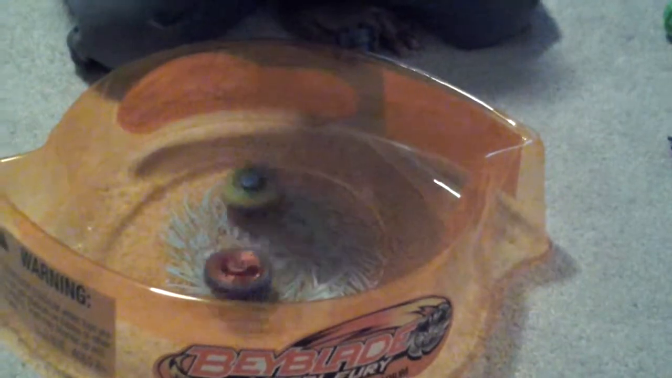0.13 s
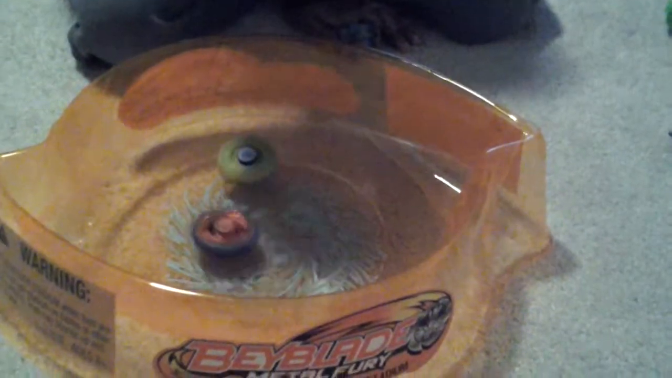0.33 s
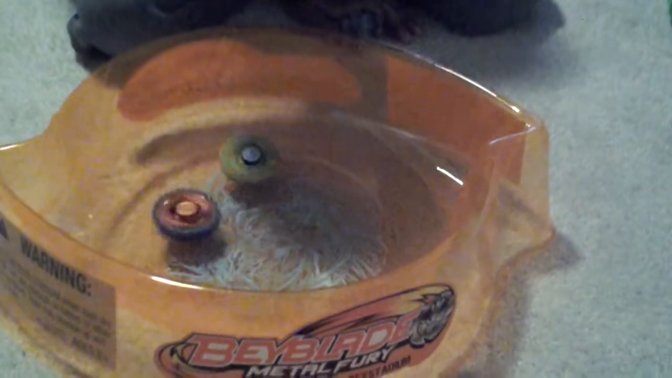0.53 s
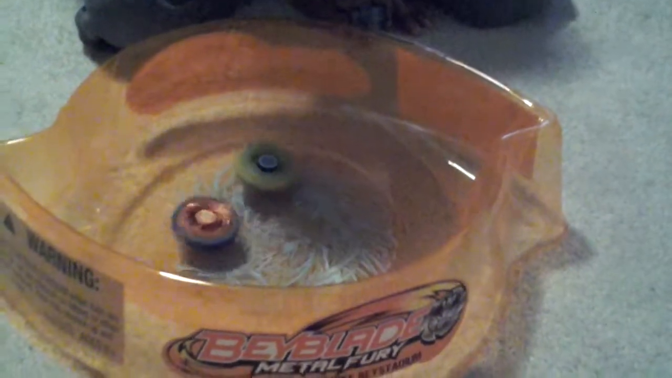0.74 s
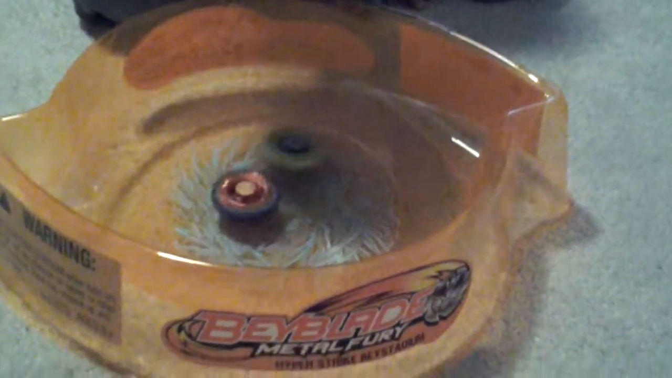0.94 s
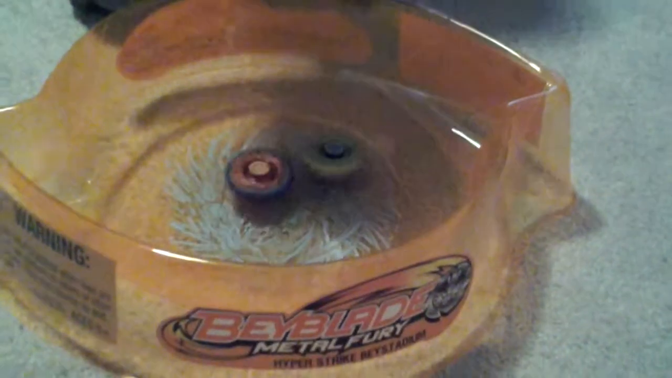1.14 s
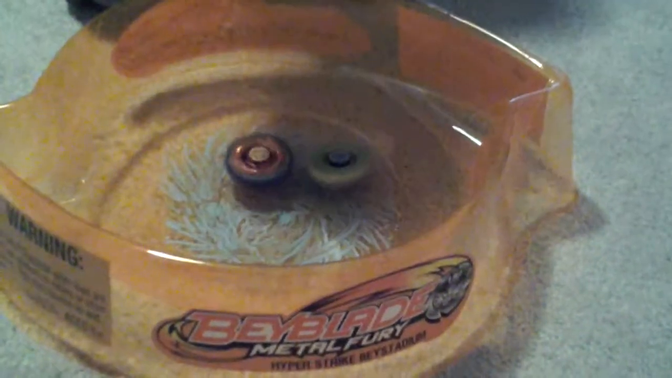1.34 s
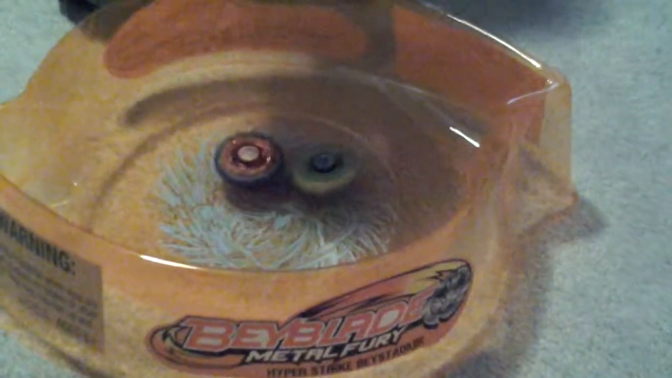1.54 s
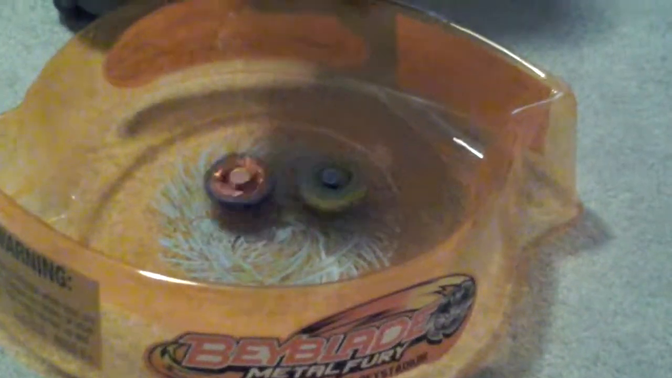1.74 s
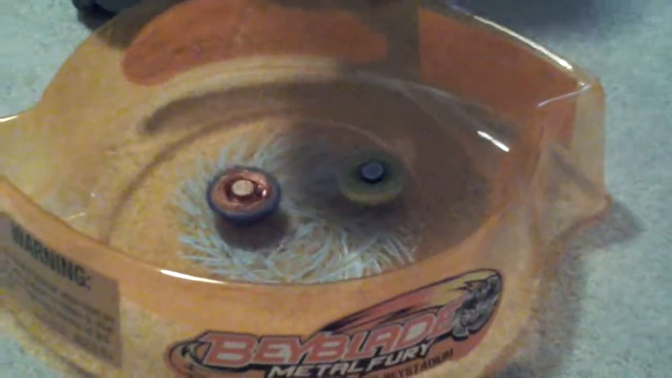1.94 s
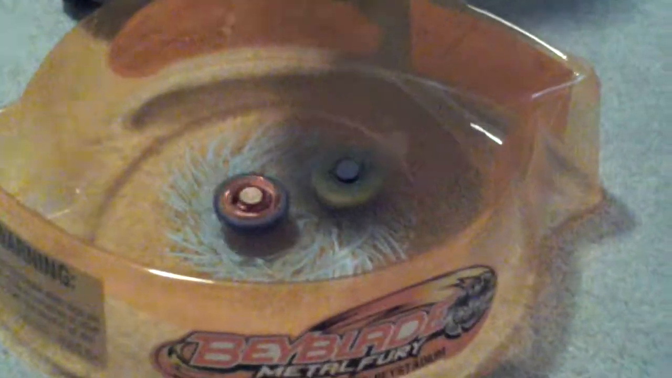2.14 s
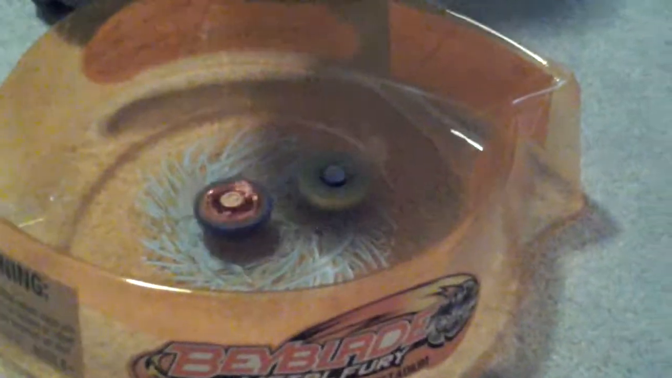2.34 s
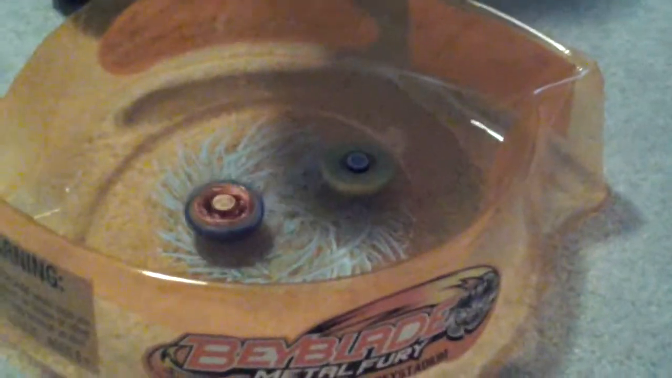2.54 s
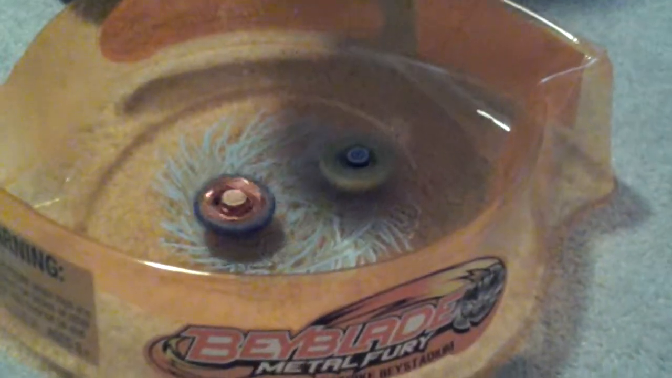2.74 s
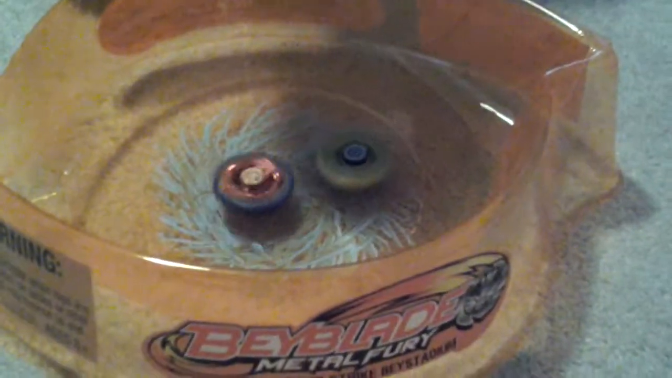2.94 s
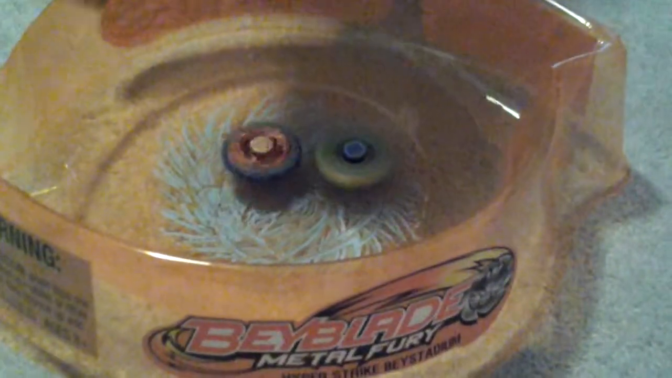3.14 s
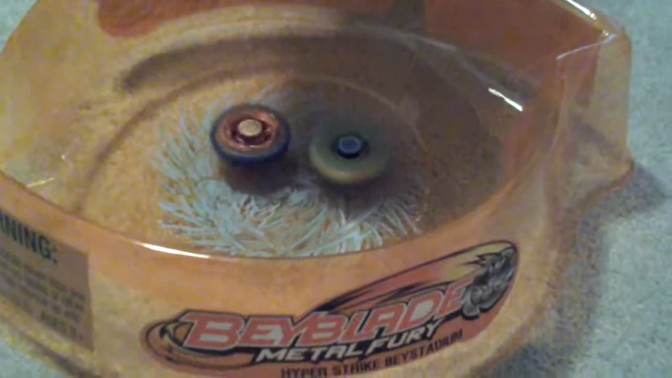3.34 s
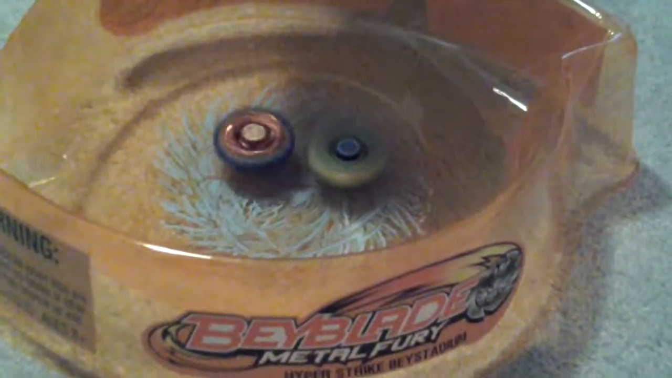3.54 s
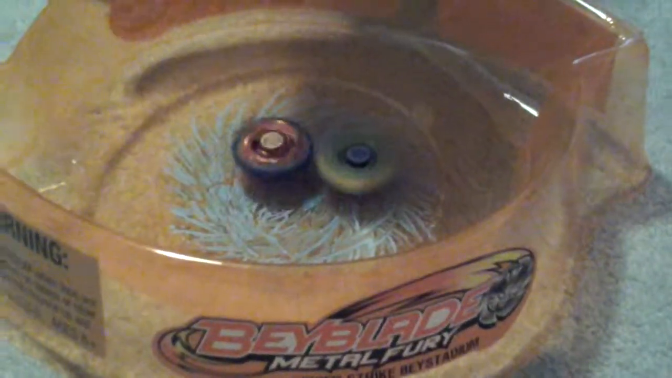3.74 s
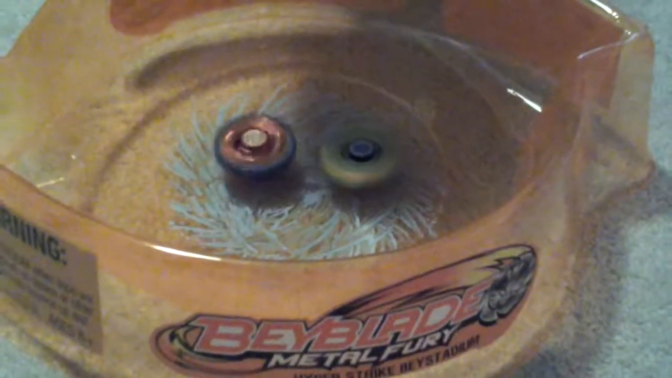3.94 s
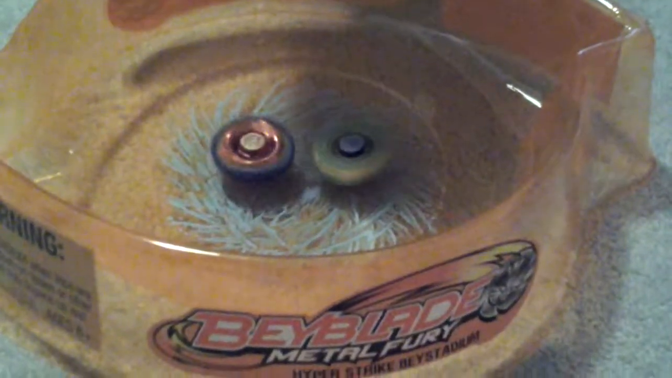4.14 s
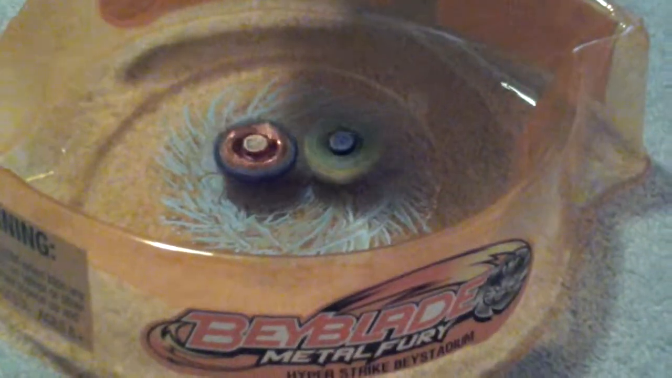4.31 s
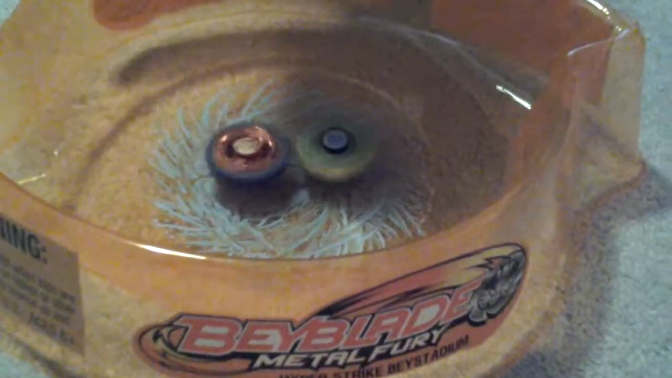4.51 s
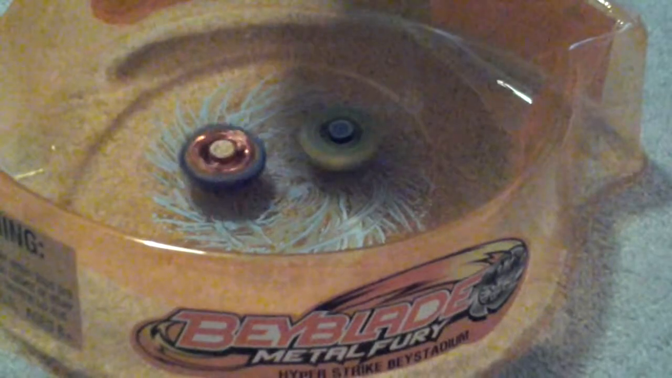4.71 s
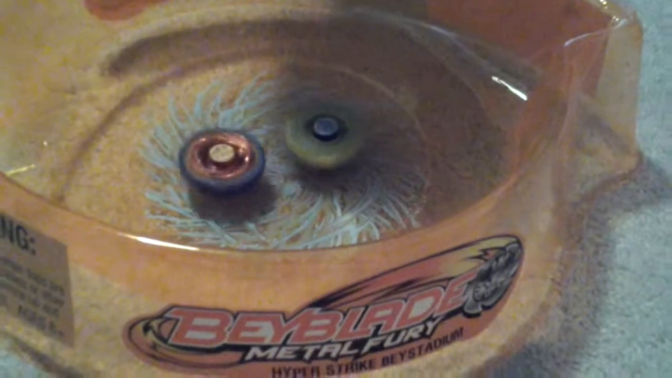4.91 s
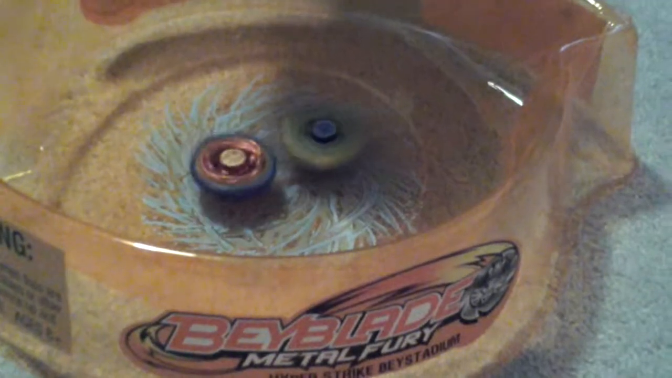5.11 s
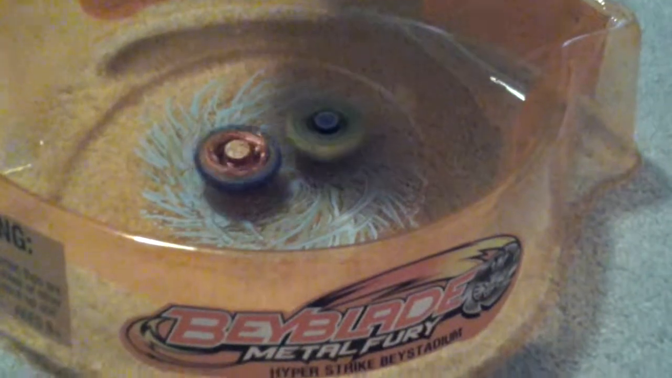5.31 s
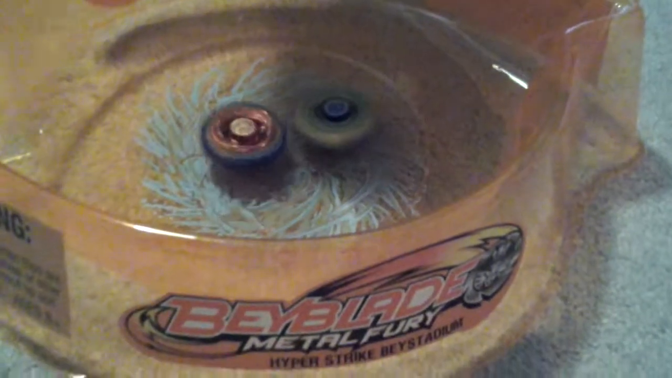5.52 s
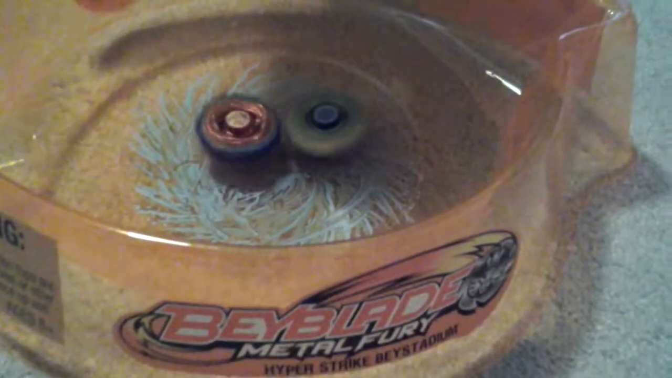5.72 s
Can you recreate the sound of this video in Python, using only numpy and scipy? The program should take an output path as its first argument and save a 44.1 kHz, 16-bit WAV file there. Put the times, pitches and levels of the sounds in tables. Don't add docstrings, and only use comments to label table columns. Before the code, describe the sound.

Two metal spinning tops grind and rattle rapidly in a thin plastic bowl, clashing with sharp, ringing cracks over a steady appliance hum.

```python
import sys
import numpy as np
from scipy import signal
from scipy.fft import rfft, irfft, next_fast_len
from scipy.io import wavfile
from scipy.ndimage import uniform_filter1d

SR = 44100
rng = np.random.default_rng(int(sys.argv[2]) if len(sys.argv) > 2 else 0)


def waveform_to_disk(signal):
    frames = np.transpose(np.atleast_2d(signal))
    scaled = np.clip(frames, -1, 1) * 32767
    samples = np.round(scaled).astype(np.int16)
    wavfile.write(sys.argv[1], SR, samples)


def ratio(d):
    e = np.asarray(d, float) / 20
    return 10 ** e


N = 258867

# (frequency [Hz], density [dB per Hz])
AIR_SPECTRUM = [(24, -71), (40, -34.5), (123, -35), (218, -6.5), (287, -19), (333, -9.5), (577, -8.5),
                (722, -5.5), (973, -9.5), (1190, -2.5), (3300, -18), (8310, -32), (9650, -28),
                (14000, -22.5), (15500, -90)]
AIR_DB = -38.5
# (frequency [Hz], bandwidth [Hz], level [dB])
HUM_RESONANCES = [(109, 2.7, -69), (194, 5, -84), (230, 10, -63), (305.5, 21, -57.5), (347.5, 29, -54.5),
                  (654.4, 4.4, -53.5), (737.4, 12, -47.5), (718, 95, -62.5), (841, 6.2, -51.5),
                  (1169, 7.7, -52)]
# (frequency [Hz], level [dB])
HUM_TONES = [(359, -52.5), (737, -51.5), (122, -74)]
# (frequency [Hz], t60 [s])
ROOM_DECAY = [(250, 0.34), (1000, 0.82), (3000, 0.31), (6000, 0.25), (10000, 0.25), (15000, 0.26)]
# (delay [s], level [dB])
NEAR_ECHOES = [(.0045, -26), (0.0115, -25.5), (0.0185, -63), (.026, -24.5)]
# (time [s], level [dB])
GRIND_LEVEL = [
    (0, -43.5),
    (0.401, -44),
    (1, -49),
    (2, -53.5),
    (3.001, -55),
    (4, -58),
    (5.002, -65),
    (5.87, -55.5),
]
# (frequency [Hz], gain [dB])
TIP_COLOUR = [(120, -16.5), (250, 6), (500, 5), (1200, 0), (2500, -5.5), (4500, -7), (7000, -10),
              (11000, -17.5)]

# (frequency [Hz], gain [dB])
SHELL_COLOUR = [(2500, -23.5), (3300, -9), (4000, -7), (5000, 3), (5600, 0.5), (6200, 4), (6900, -7.5),
                (7800, -7.5), (9200, -15.5), (10500, -17.5), (14000, -19.5)]
SPIN_START, DRAG_PER_S, FIRST_TURN = 28.64, 1.237, -0.022
# (time [s], loss [turns per second])
SPIN_LOSSES = [
    (.906, .954),
    (1.758, .27),
    (2.34, -.051),
    (3.779, .114),
    (4.553, .321),
]
# (start [s], first knock [dB], second knock [dB],
# place of the second knock in the turn [0-1], brightness [dB per octave])
WOBBLE_SWINGS = [(-.05, -35.5, -33.5, 0.59, 0), (.25, -35, -37, 0.58, -1), (0.458, -39.5, -35, 0.54, -2),
                 (0.691, -38.5, -36, 0.44, -1.5), (0.901, -36, -36.5, 0.66, -1.5),
                 (1.251, -40.5, -32.5, 0.62, -0.5), (1.51, -38, -31.5, .54, -.5),
                 (1.758, -39, -33.5, 0.7, -5.5), (2.149, -35, -37, 0.65, -1.5), (2.36, -36, -34, .56, 0),
                 (2.75, -33.5, -34, 0.58, 1), (3.049, -39.5, -43, .55, -2.5), (3.189, -41, -34.5, 0.65, 0),
                 (3.619, -39, -38, .58, -2), (3.922, -38.5, -42.5, .62, -0.5), (4.44, -39, -38, 0.63, -5),
                 (4.97, -55, -53, .56, -9), (5.45, -53, -49, 0.4, -7), (5.8, -69, -80, .6, -15.5)]
LULL_DB, WAKE_S, TIRE_S, SAG_DB_PER_S = (6, 9), 0.05, 0.04, (5, 9)
FIRST_PLACE, SLIDE_PER_S = 0.038, (0.17, 0.34)
KNOCK_S = (0.0037, 0.0053)

# (time [s], peak [dB], brightness [dB per octave], contact time [ms], share sent to the room [dB])
RIM_CLASHES = [(0.906, -3.5, 3.5, 2.58, 5), (1.758, 3.5, 2.7, 2.33, 2), (2.34, 5.5, 2.8, 3.13, 3),
               (3.737, -8.5, 1.5, 3.2, 1.5), (3.779, -2.5, 3.2, 2.3, 4.5), (4.327, -8.5, 2.5, 4.2, 1.5),
               (4.498, -8, 0.5, 3.4, 1), (4.553, -2, 2.9, 2.55, 1), (5.111, -6.5, 1.3, 2.33, 2),
               (5.462, -4.5, 1, 2.2, 7), (5.842, -7, 2, 2.26, 2)]
# (frequency [Hz], frequency [Hz], frequency [Hz])
STRUCK_PARTS = [(7300, 5200, 6000), (6330, 6990, 5000), (4800, 5850, 7430), (3970, 5020, 5880),
                (3970, 7600, 5600), (5910, 7050, 4500), (4710, 3910, 4300), (5450, 9010, 3400),
                (5310, 6160, 4520), (4530, 7590, 5290), (3890, 5190, 4530)]
# (level [dB], level [dB], level [dB])
STRUCK_PART_DB = (10, 8, 7)
OFF_AXIS = 0.33
# (time [s], peak [dB])
GLANCING_TOUCHES = [
    (0.9025, -11),
    (0.9315, -53),
    (3.729, -45),
    (3.79, -39),
    (4.492, -24),
    (4.566, -18),
    (4.574, -35),
]
# (oval mode [dB], first wheel's high mode [dB], second wheel's high mode [dB],
# bowl floor [dB], bowl wall [dB])
CLASH_RINGS = [(-44, -45, -52, -12, -22), (-15.5, -38, -25, -15, -22), (-20, -24, -45, -17, -20),
               (-50, -45, -52, -22, -20), (-50, -48, -46, -17, -14), (-30, -52, -44, -24, -11),
               (-48, -40, -55, -18, -14), (-49, -35, -50, -23, -21), (-26, -62, -62, -21, -22),
               (-13.5, -50, -36, -21, -18), (-26, -47, -43, -17, -11)]
# (column of CLASH_RINGS, frequency [Hz], level [dB], t60 [s])
METAL_MODES = [(0, 4520, 0, .24), (0, 4570, -1, .2), (0, 4465, -6, .12), (0, 4640, -7, .12),
               (1, 11440, -2, .13), (1, 11550, 0, .1), (2, 11950, 0, .14), (2, 11850, -3, .14),
               (2, 12020, -5, .12)]
# (frequency [Hz], gain [dB])
CRACK_COLOUR = [(300, -17), (1200, -11), (2200, -9), (3000, -9), (3800, 1), (5000, 0.5), (6300, -3.5),
                (7500, -4), (10000, -12.5), (11600, -10), (13500, -12.5), (15700, -21)]
# (frequency [Hz], level [dB], t60 [s])
BOWL_MODES = [(580, -9.5, 0.04), (1027, -14, 0.07), (1413, -18, 0.13), (1693, -0.5, 0.029),
              (1800, -14.5, 0.024), (2633, -5.5, 0.039), (2590, 12, 0.015)]
WALL_HZ = 2200

MIC_LOW_HZ, MIC_HIGH_HZ = 110, 14700
# (time [s], level [dB])
INPUT_JOLTS = [
    (1.758, -28.5),
    (2.34, -47),
    (3.779, -42),
    (4.327, -57),
    (4.499, -53),
    (4.553, -28.5),
    (5.462, -59),
]
JOLT_S = 0.00041
# (frequency [Hz], level under the loudest part [dB])
DROPOUT_LIMIT = [(60, -30.5), (250, -38), (400, -60), (7000, -71), (9000, -33), (10500, -23.5),
                 (14500, -20.5), (16000, -10)]


def evened(x):
    return x / np.sqrt(np.mean(x ** 2) + 1e-20)


def read(points, hz):
    f, value = np.transpose(points)
    return np.interp(np.log(hz + 1), np.log(f + 1), value)


def add(mix, s, sound):
    part = mix[max(round(s * SR), 0):][:len(sound)]
    part += sound[:len(part)]


def coloured(x, points, tilt_db=0, peaks=()):
    size = next_fast_len(len(x))
    hz = np.fft.rfftfreq(size, 1 / SR)
    gain_db = read(points, hz) + tilt_db * np.log2(hz / 5000 + 0.29)
    gain_db += sum(db * np.exp(-((hz - f) / 260) ** 2) for f, db in peaks)
    return irfft(rfft(x, size) * ratio(gain_db), size)[:len(x)]


def ring(hz, db, t60, t, phase=0):
    return ratio(db - 60 * t / t60) * np.sin(2 * np.pi * (hz * t + phase))


def band(hz, width):
    radius = np.exp(-np.pi * width / SR)
    drive = rng.standard_normal(N) + 1j * rng.standard_normal(N)
    envelope = signal.lfilter([1], [1, -radius], drive)
    return evened((envelope * np.exp(2j * np.pi * hz * np.arange(N) / SR)).real)


def air():
    t = np.arange(N) / SR
    wash = ratio(AIR_DB - 7.5) * evened(coloured(rng.standard_normal(N), AIR_SPECTRUM))
    tones = sum(ratio(db) * np.sin(2 * np.pi * hz * t) for hz, db in HUM_TONES)
    resonances = sum(ratio(db - 5.5) * band(hz, width) for hz, width, db in HUM_RESONANCES)
    return wash + tones + resonances


def room(x):
    out, t = np.zeros(N), np.arange(N) / SR
    for k in range(3):
        taps = np.zeros(SR // 2)
        at = np.arange(200, len(taps) - 20, 20)
        taps[at + rng.integers(0, 20, len(at))] = rng.choice([-1., 1.], len(at))
        hz, time, z = signal.stft(taps, SR, nperseg=256)
        decay = ratio(-60 * time / read(ROOM_DECAY, hz)[:, None])
        tail = signal.istft(z * decay, SR, nperseg=256)[1]
        tail *= 1 - np.exp(-np.arange(len(tail)) / SR / 0.0039)
        share = np.sqrt(2 / 3) * np.cos(np.pi * (3.1 * t + k / 3))
        out += signal.fftconvolve(x * share, tail / np.linalg.norm(tail))[:N]
    near = np.zeros(SR // 20)
    for s, db in NEAR_ECHOES:
        add(near, s, ratio(db) * rng.standard_normal(24) / 5)
    return ratio(-10.5) * out + signal.fftconvolve(x, near)[:N]


def grind():
    uneven_db = 2.8 * evened(uniform_filter1d(rng.standard_normal(N), 300))
    grains = rng.standard_normal(N) * ratio(uneven_db)
    level_db = np.interp(np.arange(N) / SR, *np.transpose(GRIND_LEVEL)) - 1
    return ratio(level_db) * evened(coloured(grains, TIP_COLOUR))


def knock_plan():
    t = np.arange(N) / SR
    turns = FIRST_TURN + SPIN_START * t - DRAG_PER_S * t ** 2 / 2
    turns -= sum(lost * np.maximum(t - s, 0) for s, lost in SPIN_LOSSES)
    start, *levels_db, place, bright_db = np.transpose(WOBBLE_SWINGS)
    plan = []
    for side, late in enumerate([FIRST_PLACE + 0 * place, place]):
        turn = np.arange(int(np.interp(start[-1], t, turns)))
        rough = np.interp(turn + side / 2, turns, t)
        swing = np.clip(np.searchsorted(start, rough) - 1, 0, len(start) - 2)
        since, until = rough - start[swing], start[swing + 1] - rough
        at = np.interp(turn + late[swing] - SLIDE_PER_S[side] * since, turns, t)
        lull = np.exp(-since / WAKE_S) + np.exp(-until / TIRE_S)
        level_db = levels_db[side][swing] - SAG_DB_PER_S[side] * since - LULL_DB[side] * lull
        plan.append([at, level_db, bright_db[swing]])
    return np.transpose(plan, (2, 0, 1)).reshape(-1, 3)


def whirr():
    when, knock_db, _ = knock_plan().reshape(-1, 2, 3).mean(1).T
    t = np.arange(N) / SR
    db = np.interp(t, when, knock_db, right=-90)
    early_db = 4 * np.exp(-t / 0.35)
    slide = coloured(rng.standard_normal(N), SHELL_COLOUR, -1.2, [(4200, 14), (5000, 4.1)])
    return ratio(db + early_db - 13.5) * evened(slide)


def rattle():
    out, t = np.zeros(N), np.arange(512) / SR
    for k, (at, level_db, bright_db) in enumerate(knock_plan()):
        length_s = KNOCK_S[k % 2]
        luck, chatter, bumps = rng.standard_normal(2), rng.standard_normal(512), rng.standard_normal(512)
        peaks = [(5900, 4.3 * bright_db), (4030, 6.7)]
        chatter = evened(coloured(chatter, SHELL_COLOUR, bright_db, peaks))
        uneven = ratio(2.4 * evened(uniform_filter1d(uniform_filter1d(bumps, 40), 30)))
        envelope = np.minimum(t / 0.00016, 1) / (1 + np.exp((t - length_s) / 0.00039))
        knock = chatter * uneven * envelope
        loud = np.sqrt(uniform_filter1d(knock ** 2, 130).max())
        gain = ratio(level_db + 0.9 * luck[0] + 3)
        add(out, at - length_s / 2 + 0.00045 * luck[1], gain * knock / loud)
    return out


def crack(db, tilt_db, contact_ms, thud_db, peaks):
    t = np.arange(4096) / SR
    u = t / (contact_ms / 1000)
    push = u ** 0.6 * (np.exp(-2.4 * u) + 0.08 * np.exp(-1.0 * u))
    noise = rng.standard_normal(len(t))
    for _ in range(2):
        even = rfft(noise * push)
        noise = irfft(even / (abs(even) + 1e-9)) / (push + 0.05 * push.max())
    sharp = coloured(np.roll(noise * push, 240), CRACK_COLOUR, tilt_db, peaks)[200:-200]
    bowl = np.zeros(len(t))
    for hz, level_db, t60 in BOWL_MODES:
        level_db += thud_db[int(hz > WALL_HZ)]
        bowl += ring(hz * rng.normal(1, 0.04), level_db, t60, t, rng.random())
    thud = ratio(-9.5) * bowl * np.minimum(t / 0.0036, 1)
    return ratio(db) * (sharp / abs(sharp).max() + thud[:-400])


def metal_ring(strength_db):
    t = np.arange(SR // 2) / SR
    modes = np.zeros(len(t))
    for column, hz, db, t60 in METAL_MODES:
        level_db = db + strength_db[int(column)]
        modes += ring(hz * rng.normal(1, 0.001), level_db, t60, t, 0.2 * rng.random())
    return ratio(3) * modes * np.minimum(t / 0.001, 1)


def clashes():
    cracks, spread, metal = np.zeros(N), np.zeros(N), np.zeros(N)
    for (s, db, *touch, spread_db), strength_db, parts in zip(RIM_CLASHES, CLASH_RINGS, STRUCK_PARTS):
        blow = crack(db + 6, *touch, strength_db[3:], list(zip(parts, STRUCK_PART_DB)))
        add(cracks, s - 0.0006, blow)
        missing = list(zip(parts, -OFF_AXIS * np.array(STRUCK_PART_DB)))
        off_axis = coloured(blow, [(100, 0.01), (16000, 0)], 0, missing)
        add(spread, s - 0.0006, ratio(spread_db) * off_axis)
        add(metal, s, metal_ring(strength_db))
    for s, db in GLANCING_TOUCHES:
        add(cracks, s, crack(db, -3.1, 3.2, (-15, -15), [(4800, 6.4)]))
    return cracks, spread, metal


def scene():
    cracks, spread, metal = clashes()
    knocks = rattle()
    wet = room(spread + knocks + ratio(-4) * metal)
    mono = cracks + knocks + metal + wet + whirr() + grind() + air()
    signs = np.repeat(rng.choice([-1, 1], N // 128 + 1), 128)[:N]
    unlike = ratio(-24) * cracks * signs
    return np.array([mono + unlike, mono - unlike])


def jolts():
    out, t = np.zeros(N), np.arange(1024) / SR
    for s, db in INPUT_JOLTS:
        add(out, s, ratio(db) * t / JOLT_S * np.exp(1 - t / JOLT_S))
    return out


def gated(x):
    hz, _, z = signal.stft(x, SR, window="cosine", nperseg=1024, noverlap=512)
    power = abs(z.mean(0)) ** 2
    loudest = uniform_filter1d(power[70:], 60, axis=0).max(0)
    luck = rng.standard_normal(power.T.shape).T
    luck = uniform_filter1d(uniform_filter1d(luck, size=8, axis=0), size=5, axis=1)
    limit_db = read(DROPOUT_LIMIT, hz)[:, None] - 9 + 3 * evened(luck)
    limit = loudest ** 0.7 * ratio(2 * limit_db)
    kept = uniform_filter1d(power, size=5, axis=0) > limit
    return signal.istft(z * kept, SR, window="cosine", nperseg=1024, noverlap=512)[1][:, :N]


def band_limit(x):
    return signal.sosfilt(signal.butter(12, 15840, fs=SR, output="sos"), x)


def record(dry):
    bass_cut = signal.butter(2, MIC_LOW_HZ, "high", fs=SR, output="sos")
    top_cut = signal.cheby1(8, 1, MIC_HIGH_HZ, fs=SR, output="sos")
    heard = signal.sosfilt(top_cut, signal.sosfilt(bass_cut, dry))
    clip_band = signal.butter(2, 900, "high", fs=SR, output="sos")
    clipping = signal.sosfiltfilt(clip_band, np.clip(heard, -1, 1) - heard)
    mix = gated(heard + clipping + ratio([[0.4], [-0.4]]) * jolts())
    return band_limit(mix)


dry = scene()
out = record(dry)
waveform_to_disk(out)
```